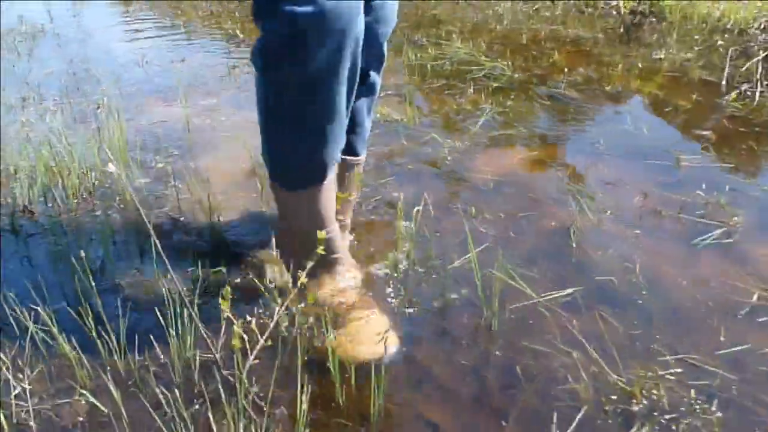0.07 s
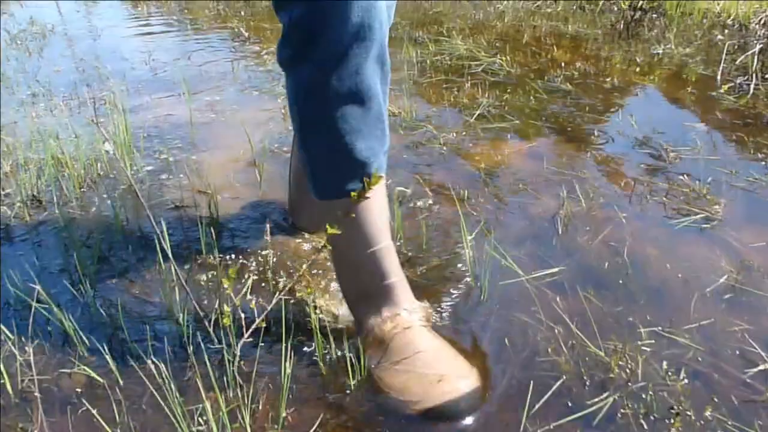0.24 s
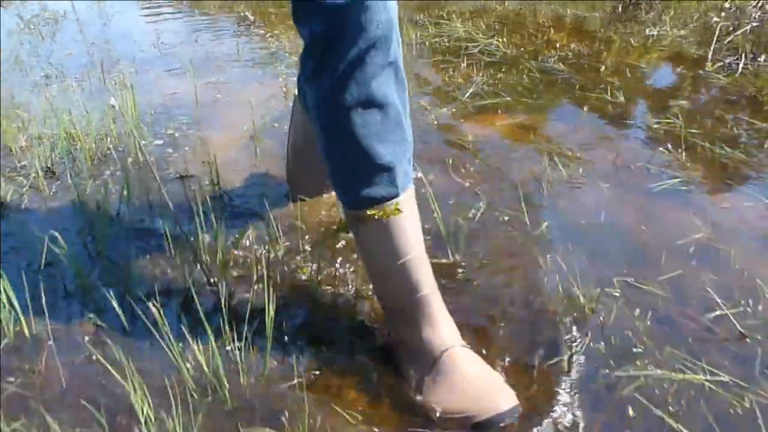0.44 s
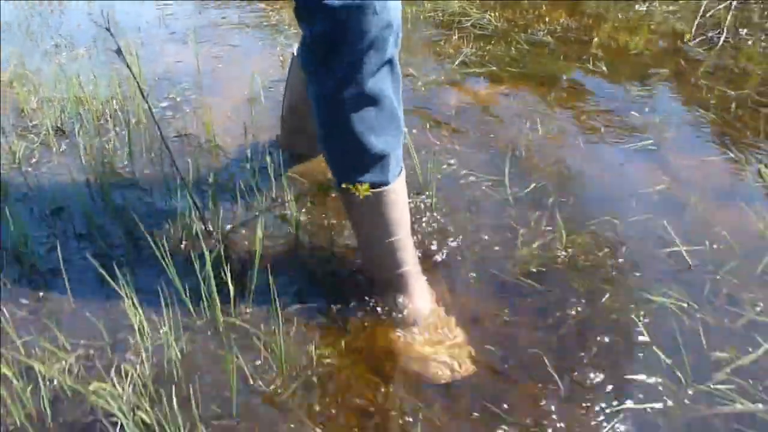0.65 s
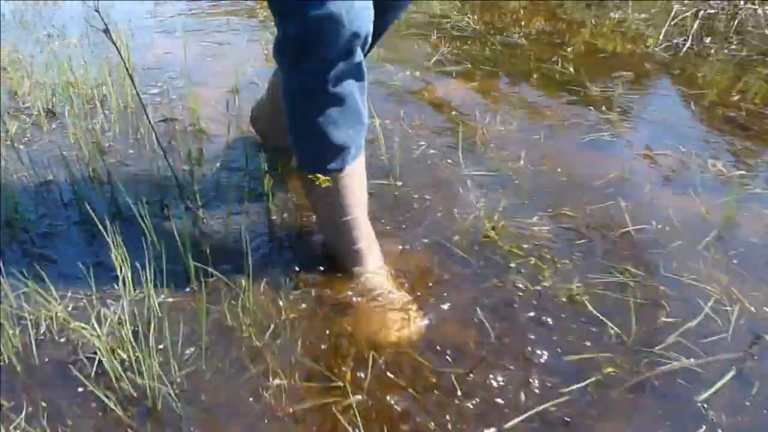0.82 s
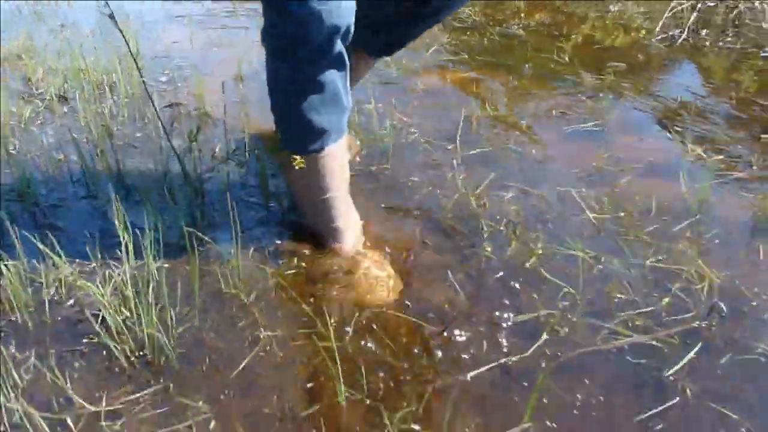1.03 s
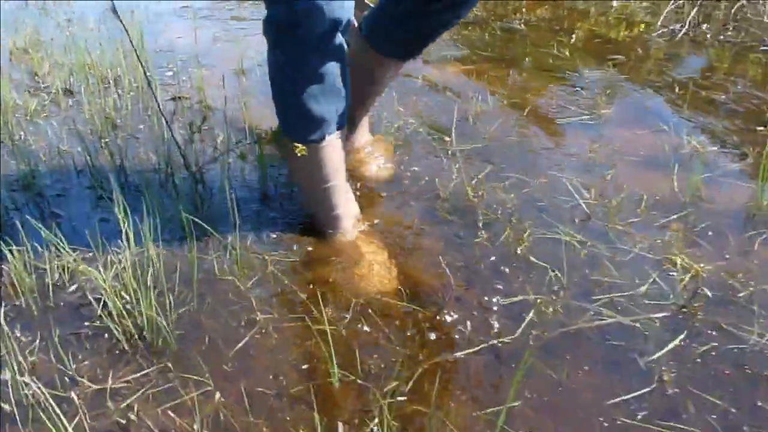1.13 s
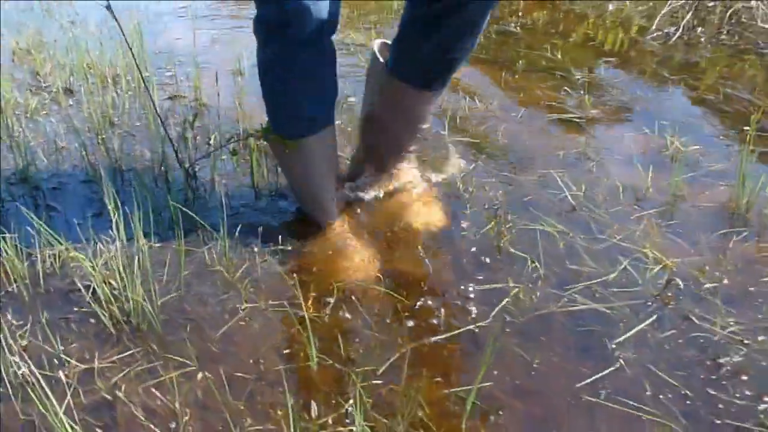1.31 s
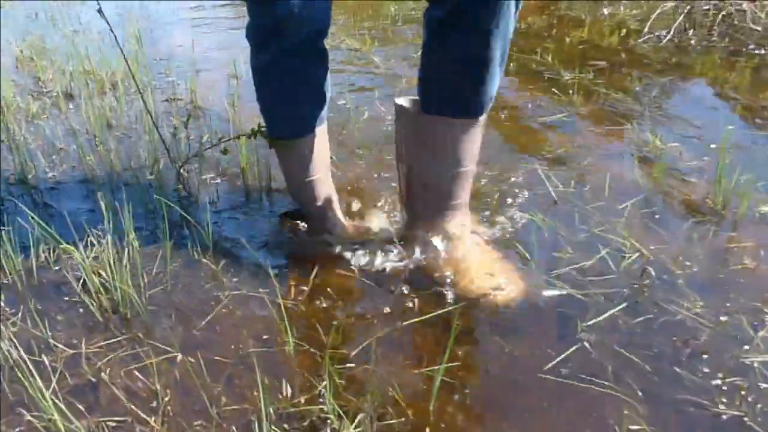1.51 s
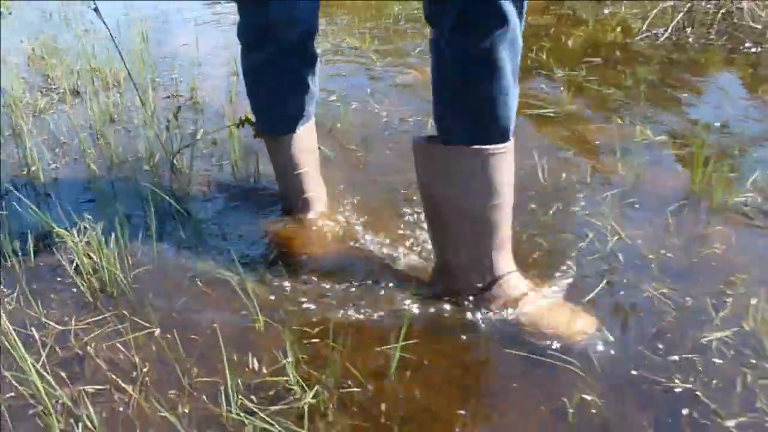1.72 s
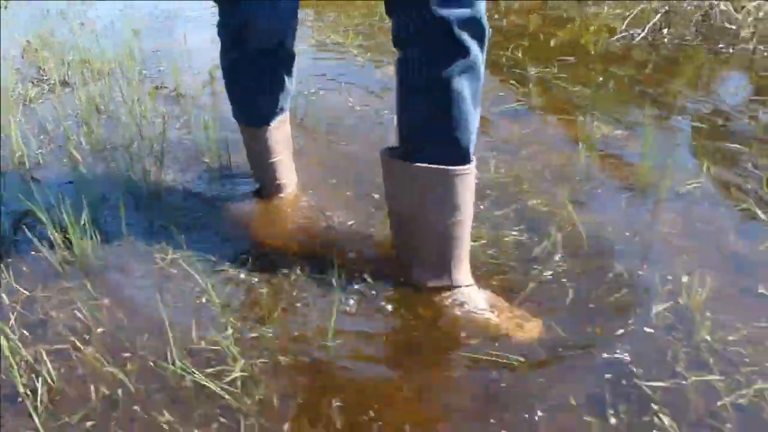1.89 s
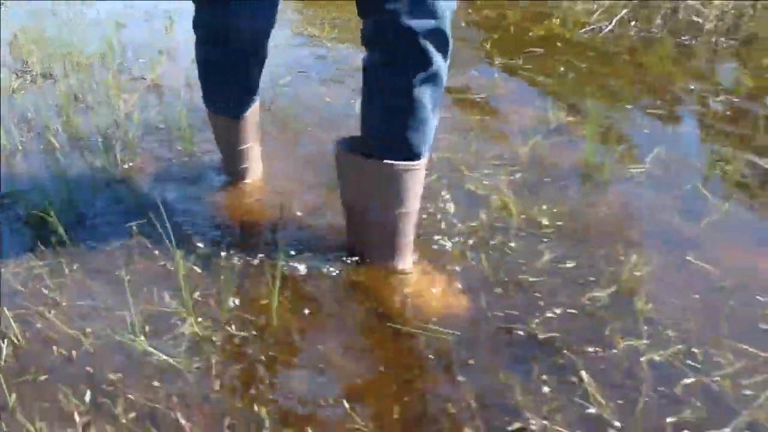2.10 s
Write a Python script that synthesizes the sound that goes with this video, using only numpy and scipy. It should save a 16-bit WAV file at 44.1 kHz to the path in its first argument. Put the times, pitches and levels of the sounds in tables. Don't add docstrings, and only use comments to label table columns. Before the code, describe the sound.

Two wading steps splash and gulp in shallow flood water, close up, drops pinging, light wind

```python
import sys
import numpy as np
from scipy import signal
from scipy.fft import rfft, irfft, next_fast_len
from scipy.io import wavfile
from scipy.ndimage import uniform_filter1d, map_coordinates

SR = 44100
rng = np.random.default_rng(int(sys.argv[2]) if len(sys.argv) > 2 else 0)


def decibels_to_gain(level_db):
    exponent = np.asarray(level_db, float) / 20
    return 10 ** exponent


def pcm_store(signal):
    levels = np.round(np.clip(np.atleast_2d(signal), -1, 1) * 32767)
    wavfile.write(sys.argv[1], SR, levels.astype(np.int16).T)


N = 94815


def unit(x):
    return x / np.sqrt(np.mean(x ** 2) + 1e-20)


def along(points, hz):
    f, v = np.transpose(points)
    return np.interp(np.log(hz + 1), np.log(f + 1), v)


def filtered(x, response):
    m = next_fast_len(N + 8192)
    spectrum = rfft(x, m) * response(np.fft.rfftfreq(m, 1 / SR))
    return irfft(spectrum, m)[..., :N]


def rush(spectrum, alike, patchy_db):
    noise = signal.stft(rng.standard_normal((2, N)), nperseg=256)[2]
    patches = uniform_filter1d(rng.standard_normal(noise.shape[1:]), size=4, axis=0)
    patches = uniform_filter1d(patches, size=5, axis=1)
    pair = signal.istft(noise * decibels_to_gain(patchy_db * unit(patches)), nperseg=256)[1][:, :N]

    def mid_and_side(hz):
        angle = np.arccos(np.clip(along(alike, hz), -1, 1)) / 2
        return decibels_to_gain(along(spectrum, hz)) * [np.cos(angle), np.sin(angle)]

    mid, side = filtered(pair, mid_and_side)
    return unit(np.array([mid + side, mid - side]))


def bubbles(s, db, hz, last_hz, length, spread_db, lag_s):
    fade_db, climb_shape = 13, 1.56
    waver_db, waver_s = 2.4, 0.003
    pitch = hz[:, None]
    t = np.arange(int(length.max() * SR) + 2) / SR
    age = np.minimum(t / length[:, None], 1)
    at = np.round(s * SR).astype(int)[:, None] + np.arange(len(t))

    waver = map_coordinates(rng.standard_normal(4096), [(at / SR / waver_s + pitch / 4) % 4000], order=1)
    phase = 2 * np.pi * np.cumsum(pitch * (last_hz / hz)[:, None] ** (age ** climb_shape), 1) / SR
    onset = np.minimum(1, 2 * t * pitch)
    release = np.minimum(3 * (1 - age), 1)
    ring = decibels_to_gain(db[:, None] - fade_db * age + waver_db * waver) * onset * release

    place = rng.standard_normal((len(s), 2))
    sides = []
    for sign in (1, -1):
        gain = decibels_to_gain(sign * spread_db * place[:, :1])
        lag = sign * 2 * np.pi * pitch * lag_s * place[:, 1:]
        voices = ring * gain * np.sin(phase + lag)
        sides.append(np.bincount(at.ravel(), voices.ravel(), N + len(t))[:N])
    return np.array(sides)


def wind():
    # frequency_hz [Hz], density_db [dB per Hz]
    wind_spectrum = [(25, -30.5), (150, -4), (350, 2), (900, -1), (1900, -12.5), (3500, -13.5), (7700, -23),
                     (8000, -55)]
    # frequency_hz [Hz], likeness [-1 to 1]
    wind_likeness = [(100, 0.16), (1000, 0.077)]
    return decibels_to_gain(-49) * rush(wind_spectrum, wind_likeness, patchy_db=1.7)


def stirring():
    # time_s [s], stirring_db [dB]
    stir_course = [(0, 4), (.14, 5), (.19, 12.5), (.44, 13), (.49, 18), (.52, 10), (.62, 5), (.78, 0),
                   (1.0, 0), (1.041, 3), (1.281, 2.5), (1.31, 6), (1.44, 5.5), (1.49, 10), (1.66, 13),
                   (1.72, 8), (1.87, 9), (1.959, 0)]
    s, db = np.transpose(stir_course)
    return np.interp(np.arange(N) / SR, s, db)


def clumps():
    clump_db, clump_s = 4, 0.004
    return clump_db * map_coordinates(rng.standard_normal(512), [np.arange(N) / SR / clump_s], order=1)


def swarm(count, db, hz, octaves, cycles, rise, burst_db):
    grows, scatter_db = 0.6, 4.3
    stir = stirring()
    draw = rng.random((count, 5))
    share = np.cumsum((decibels_to_gain(stir) - 0.9) * decibels_to_gain(2 * burst_db))
    s = np.interp(draw[:, 0], share / share[-1], np.arange(N)) / SR
    pitch = np.clip(hz * 2 ** (octaves * (2 * draw[:, 1] - 1)), 200, 8000)
    level = db + grows * stir[(s * SR).astype(int)] - scatter_db * np.log(draw[:, 2] + 0.03)
    last_pitch = pitch * (1 + rise * draw[:, 3])
    life = cycles * (0.4 + 1.6 * draw[:, 4] ** 2) / pitch
    return bubbles(s, level, pitch, last_pitch, life, spread_db=1.1, lag_s=6e-6)


def spray(burst_db):
    # frequency_hz [Hz], density_db [dB per Hz]
    spray_spectrum = [(250, -12), (700, -11), (3000, 10), (8000, -16.5)]
    gain = decibels_to_gain(-67 + burst_db / 2) * (decibels_to_gain(stirring()) - 1)
    return gain * rush(spray_spectrum, [(500, 0.46)], patchy_db=4.5)


def slosh():
    burst_db = clumps()
    burble = swarm(count=600, db=-55.5, hz=916, octaves=0.8, cycles=8.44, rise=0.4, burst_db=burst_db / 2)
    fizz = swarm(count=2200, db=-59, hz=3557, octaves=1.2, cycles=8.16, rise=0.24, burst_db=burst_db)
    return burble + fizz + spray(burst_db)


def gulps():
    # start_s [s], level_db [dB peak], pitch_hz [Hz], last_pitch_hz [Hz], length_s [s]
    first_gulps = [(0.008, -36, 1050, 1400, 0.019), (0.2395, -39, 910, 1280, 0.031),
                   (0.261, -22.5, 1142, 1535.0, 0.003), (0.2728, -29.5, 1407, 2110, 0.024),
                   (0.308, -34, 1390, 1730, 0.0081), (0.322, -32.5, 738, 755, 0.018),
                   (0.3546, -32, 687, 1060, 0.015), (0.451, -29.5, 1000, 1230, 0.032),
                   (0.4667, -36, 706, 860, 0.01), (0.4712, -13.5, 1370, 1770, 0.0032),
                   (0.4713, -11, 591.5, 604, 0.017), (0.4849, -18.5, 1330, 2750, 0.021),
                   (0.4917, -17.5, 895, 1155, 0.0085), (0.6375, -19, 1910, 3450, 0.0017),
                   (0.6394, -39, 912, 1080, 0.038)]
    second_gulps = [(1.0598, -32, 802, 900, 0.011), (1.133, -27, 1120, 1380, 0.0045),
                    (1.3437, -15.5, 826, 820, 0.0042), (1.4992, -20, 774.7, 810, 0.028),
                    (1.578, -27, 568, 790, 0.0196), (1.6037, -32.5, 1202, 1480, 0.023),
                    (1.6398, -26, 660, 1330, 0.022), (1.645, -18.5, 679, 973, 0.0211),
                    (1.6524, -23, 898, 1460, 0.0167), (1.6658, -23.5, 986, 1870, 0.017),
                    (1.672, -29.5, 508, 588, 0.0305), (1.729, -30, 1684, 2230, 0.01),
                    (1.7299, -29.5, 460, 426, 0.023), (1.785, -33, 488, 520, 0.023),
                    (1.797, -30.5, 863, 950, 0.018), (1.817, -30, 891, 1015, 0.037),
                    (1.856, -16, 2095, 2835.0, 0.00097), (1.876, -32, 527.5, 1188, 0.075),
                    (1.8761, -32, 1440, 1600, 0.011)]
    # start_s [s], level_db [dB peak], pitch_hz [Hz], length_s [s]
    faint_gulps = [(0.154, -48, 616, 0.0051), (0.198, -43, 1340, 0.012), (.217, -36.5, 2130, 0.0091),
                   (0.402, -33, 488, 0.01), (0.503, -29.5, 723, 0.0094), (0.705, -44, 1444, 0.029),
                   (1.692, -32, 501, 0.024), (1.021, -40.5, 1360, 0.0083), (1.033, -36, 490, 0.022),
                   (1.097, -41.5, 657, 0.03), (1.175, -36, 2140, 0.0024), (1.231, -41.5, 1250, 0.015),
                   (1.314, -37, 2263, 0.0052), (1.406, -37, 758, 0.03), (1.452, -35, 1044, 0.016),
                   (1.466, -34, 1480, 0.0055), (1.478, -40.5, 1165, 0.035), (1.554, -35.5, 435, 0.024),
                   (1.516, -36.5, 805, 0.029), (1.348, -34, 778, 0.023),
                   (0.13, -43, 1600, 0.011), (0.159, -36.5, 559, 0.0047), (0.169, -45, 1330, 0.011),
                   (0.18, -40.5, 1510, 0.011), (.244, -35.5, 1020, 0.0037), (0.251, -34, 663, 0.0063),
                   (.281, -29.5, 720, .006), (0.33, -32.5, 1370, 0.0048), (0.363, -34.5, 1100, 0.0091),
                   (0.381, -28, 638, 0.0071), (0.411, -33, 1800, 0.0032), (0.432, -36, 1105, 0.0026),
                   (0.558, -31.5, 888, 0.0063), (1.3, -38, 1350, 0.0055), (1.365, -45, 1200, 0.017),
                   (1.5, -40.5, 1670, 0.0089), (1.574, -38, 970, .01), (1.582, -35.5, 1002, .014),
                   (1.776, -41, 1515, 0.016), (1.774, -29.5, 480, 0.011)]
    rise, low_cut_hz = 1.188, 260

    faint = [(s, db, hz, hz * rise, length) for s, db, hz, length in faint_gulps]
    rings = bubbles(*np.transpose(first_gulps + second_gulps + faint), spread_db=0.8, lag_s=3.6e-5)
    return filtered(rings, lambda hz: (1j * hz / (low_cut_hz + 1j * hz)) ** 2)


def drops():
    # start_s [s], level_db [dB peak], pitch_hz [Hz], length_s [s]
    first_drops = [(0.115, -36, 3115, 0.0059), (0.1228, -19.5, 4980, 0.00082),
                   (0.1243, -31.5, 2250, 0.0044), (0.2027, -35.5, 3163, 0.0065),
                   (0.231, -30.5, 3496, 0.0035), (0.2465, -20.5, 3300, 0.00091),
                   (0.3191, -21, 3820, 0.0019), (0.366, -25, 2892.0, 0.0019), (0.368, -22.5, 6030, 0.00078),
                   (0.38, -10, 4570, 0.00029), (0.3888, -18.5, 3050, 0.0019), (0.487, -17.5, 4970, 0.00036),
                   (0.4895, -20, 3060, 0.0035), (0.496, -21, 2164, 0.0026)]
    second_drops = [(1.0274, -40, 6410, 0.0021), (1.0322, -43, 4110, 0.0034), (1.0386, -35.5, 4030, 0.001),
                    (1.2738, -22.5, 4800, 0.0026), (1.494, -29.5, 5580, 0.00038),
                    (1.5734, -37, 3710, 0.0012), (1.648, -19, 3060, 0.0008), (1.655, -14, 5110, 0.00085),
                    (1.695, -20, 3700, 0.0009), (1.825, -23, 3155, 0.0033), (1.83, -25, 2965, 0.00078),
                    (1.8587, -30.5, 4060, 0.003), (1.8593, -24, 2385, 0.0058), (2.0965, -48, 3110, 0.0071)]
    # start_s [s], level_db [dB peak], pitch_hz [Hz],
    # length_s [s]
    further_drops = [(0.0374, -35, 3790, 0.0014), (0.3414, -35.5, 4490, 0.0038),
                     (0.3203, -24.5, 2810, 0.0032), (0.537, -34, 5700, 0.0022), (0.558, -35, 6660, 0.009),
                     (.6366, -25, 2430, 0.0049), (0.697, -38.5, 3615, 0.0027), (0.906, -44.5, 3440, 0.0021),
                     (1.094, -49, 4140, 0.0018), (1.484, -22.5, 3530, 0.0004), (1.641, -30, 7360, 0.001),
                     (1.701, -33, 3320, 0.0037), (1.7516, -38.5, 5420, 0.0035), (1.782, -30.5, 5500, 0.001),
                     (1.859, -34, 6040, 0.0018), (1.944, -38, 2575, 0.0034),
                     (0.167, -43, 3540, 0.0032), (.1836, -38, 4640, 0.0025), (0.193, -33.5, 3500, 0.0012),
                     (.2165, -30, 4500, .001), (0.237, -34, 2800, 0.0079), (0.2894, -32, 2800, .005),
                     (0.294, -37, 3900, 0.0033), (0.3633, -30.5, 6400, 0.0013), (0.375, -36, 4600, .003),
                     (0.388, -31, 5000, 0.00085), (0.4, -34, 2250, 0.0053), (0.41, -33.5, 5700, 0.0028),
                     (0.44, -38, 2890, 0.0033), (0.449, -37.5, 4900, 0.0022), (0.463, -33.5, 2930, .004),
                     (.557, -37, 3000, 0.0035), (.591, -37.5, 5600, 0.0017), (0.597, -43, 2500, 0.0028),
                     (0.605, -40.5, 5200, 0.0014), (0.637, -37.5, 6500, 0.0012), (1.2684, -34, 2910, .003),
                     (1.2725, -25, 2900, .001), (1.309, -42, 5700, 0.0027), (1.4804, -30.5, 6000, 0.00041),
                     (1.5235, -42, 2820, .004), (1.528, -44.5, 6700, 0.002), (1.587, -46, 3300, 0.0019),
                     (1.605, -32.5, 3400, 0.0015), (1.61, -35.5, 5000, 0.0017), (1.6426, -29.5, 2800, .002),
                     (1.675, -40, 3300, 0.0037), (1.773, -43, 3400, 0.001), (1.778, -41, 4300, .004),
                     (1.817, -36, 3300, 0.00216), (1.922, -55, 3180, 0.0016)]
    rise, splinter_db, splinter_t60_s = 1.064, -8.5, 0.015

    s, db, hz, length = np.transpose(first_drops + second_drops + further_drops)
    pings = bubbles(s, db, hz, hz * rise, length, spread_db=0.4, lag_s=6e-6)
    t = np.arange(SR // 50) / SR
    tail = rng.standard_normal(len(t)) * decibels_to_gain(-60 * t / splinter_t60_s)
    tail = tail / np.linalg.norm(tail)
    splinters = signal.fftconvolve(pings, tail[None], axes=1)[:, :N]
    return pings + decibels_to_gain(splinter_db) * splinters


def scene():
    return wind() + slosh() + gulps() + drops()


def band_limit(x):
    return signal.sosfilt(signal.butter(12, 9000, fs=SR, output="sos"), x)


def record(dry):
    # frequency_hz [Hz], gain_db [dB]
    camera_response = [(25, -30), (120, -18), (300, -7), (7000, 5), (7700, -6.5), (7950, -19), (8600, -11),
                       (9300, -28), (10000, -75)]
    x = filtered(dry, lambda hz: decibels_to_gain(along(camera_response, hz)))
    hiss = decibels_to_gain(-99) * rng.standard_normal(x.shape)
    return band_limit(x + hiss)


dry = scene()
out = record(dry)
pcm_store(out)
```